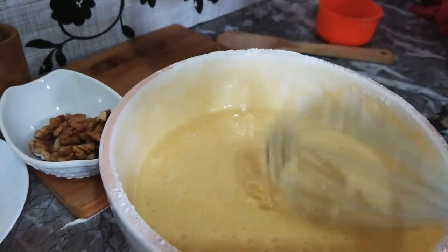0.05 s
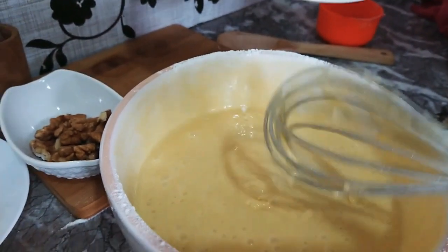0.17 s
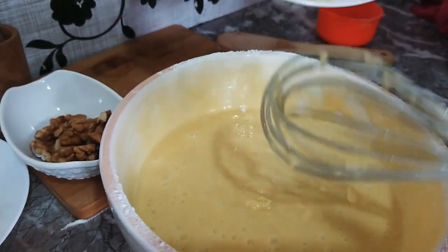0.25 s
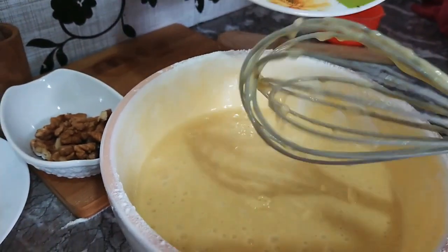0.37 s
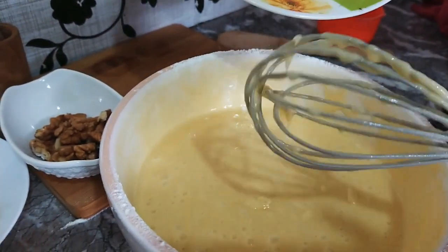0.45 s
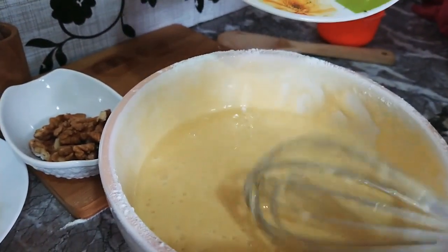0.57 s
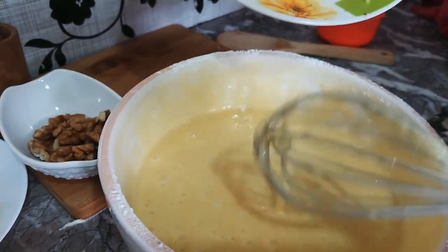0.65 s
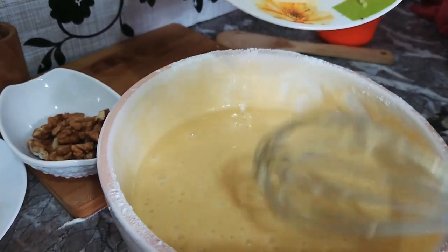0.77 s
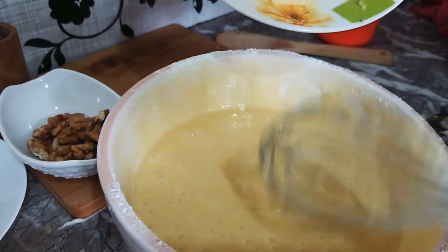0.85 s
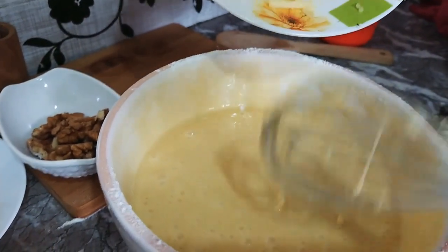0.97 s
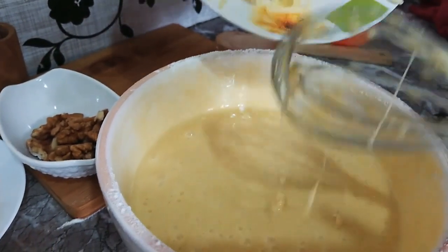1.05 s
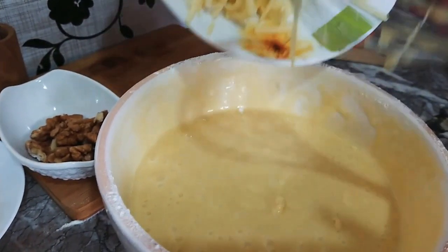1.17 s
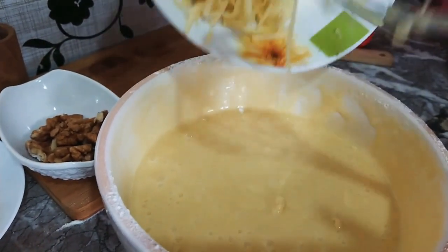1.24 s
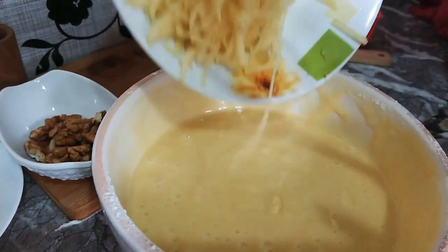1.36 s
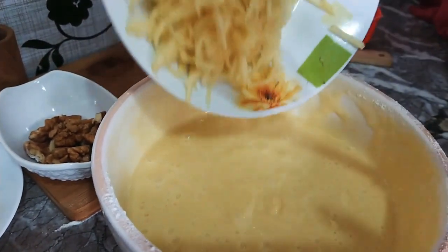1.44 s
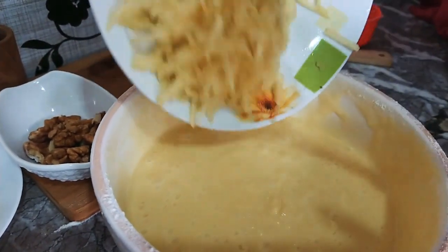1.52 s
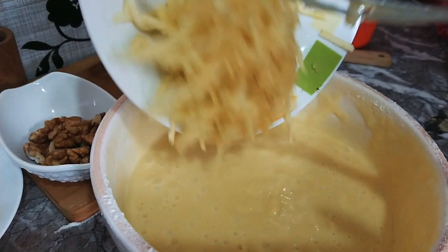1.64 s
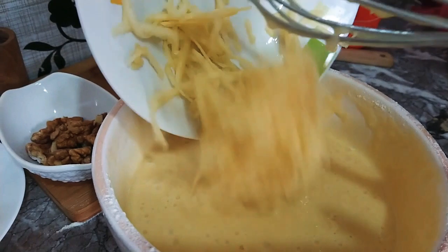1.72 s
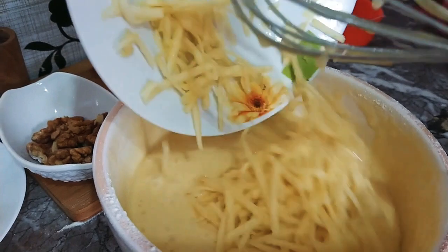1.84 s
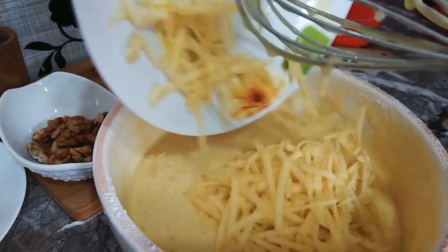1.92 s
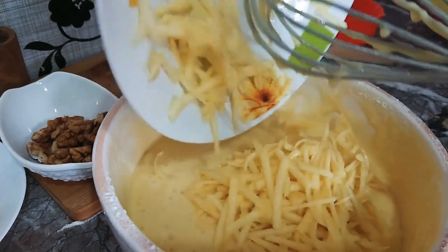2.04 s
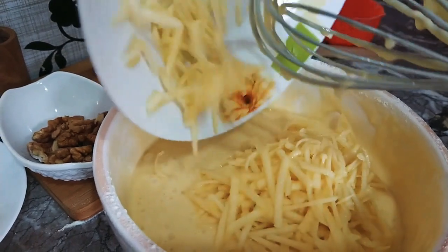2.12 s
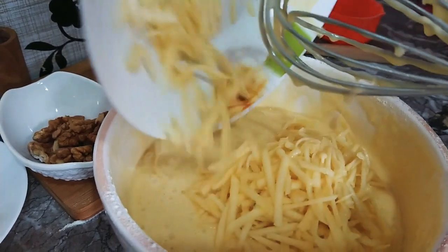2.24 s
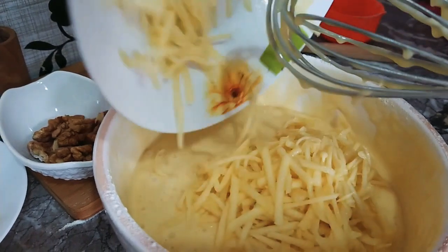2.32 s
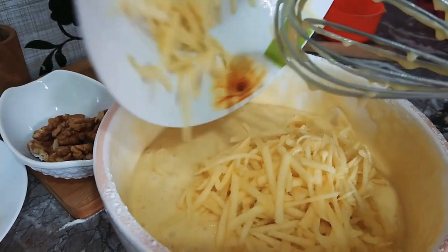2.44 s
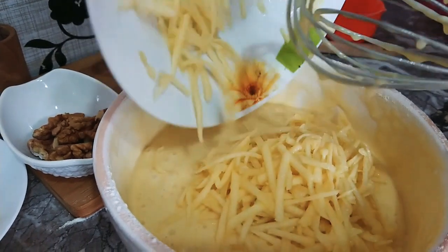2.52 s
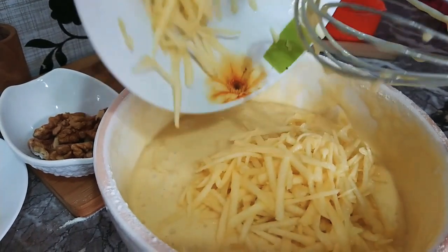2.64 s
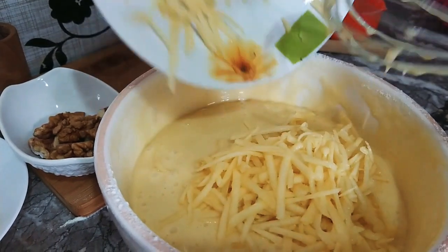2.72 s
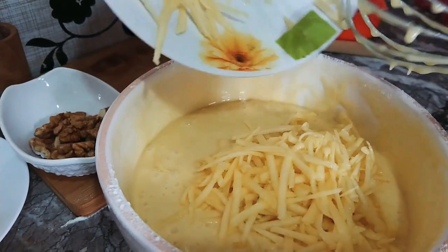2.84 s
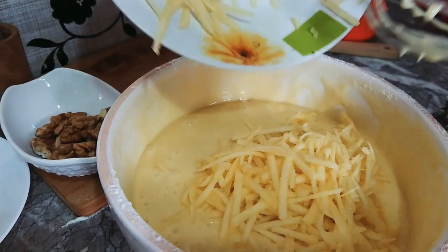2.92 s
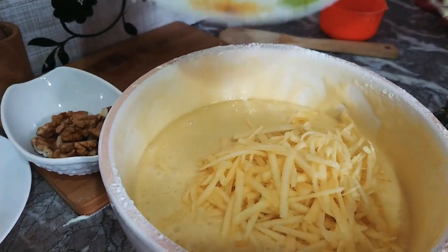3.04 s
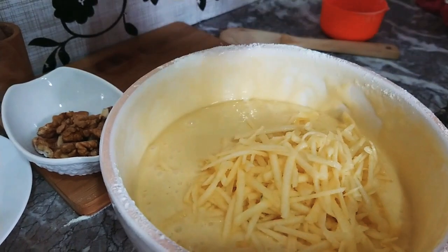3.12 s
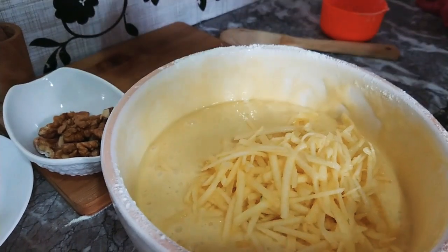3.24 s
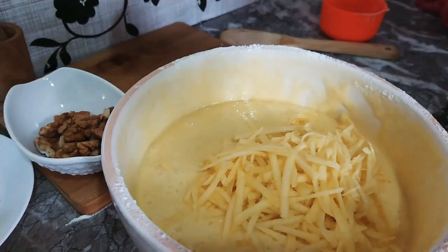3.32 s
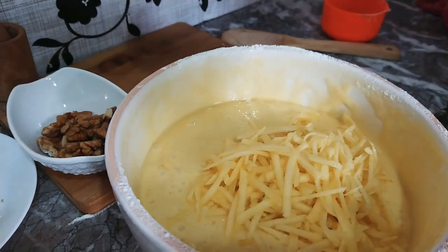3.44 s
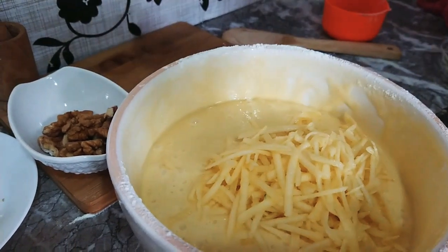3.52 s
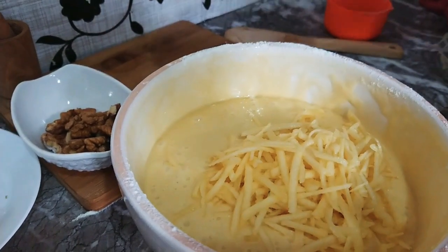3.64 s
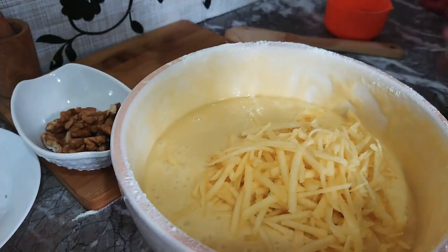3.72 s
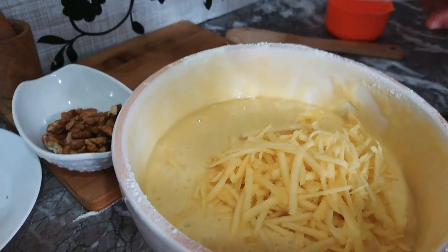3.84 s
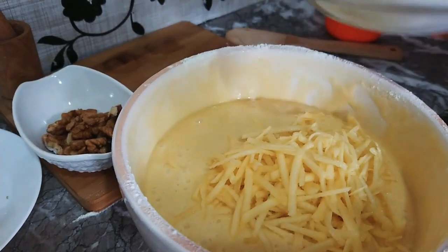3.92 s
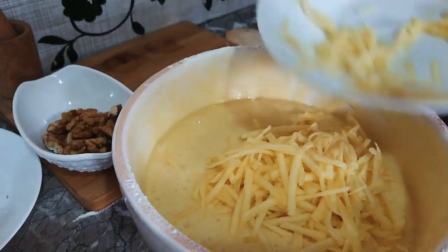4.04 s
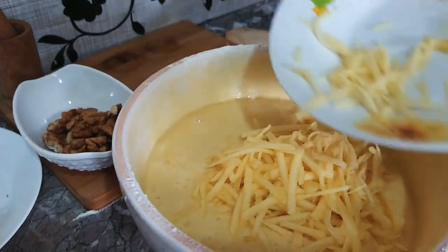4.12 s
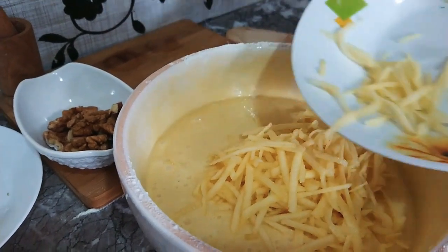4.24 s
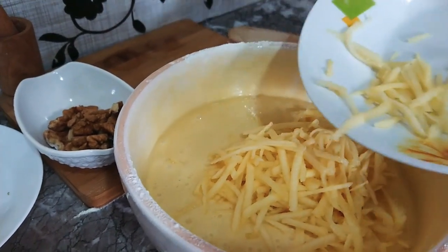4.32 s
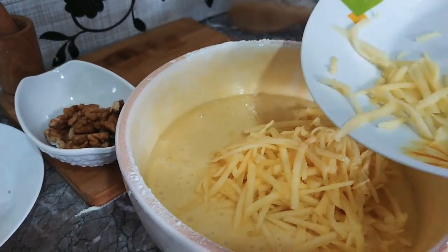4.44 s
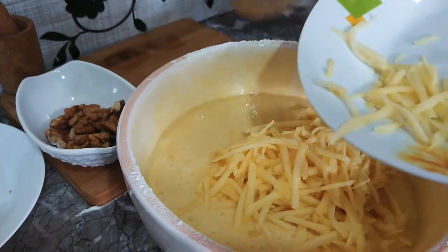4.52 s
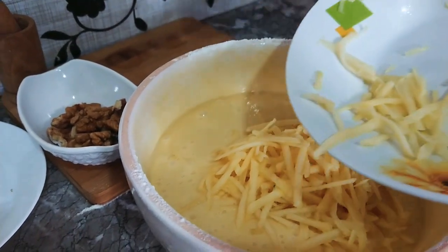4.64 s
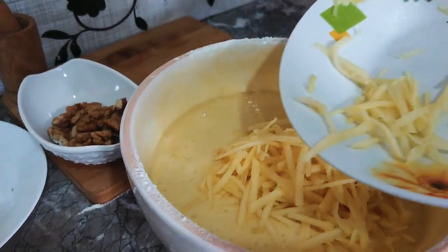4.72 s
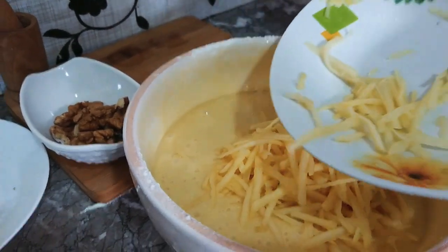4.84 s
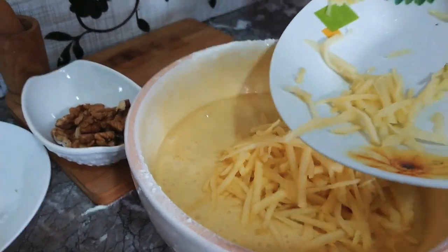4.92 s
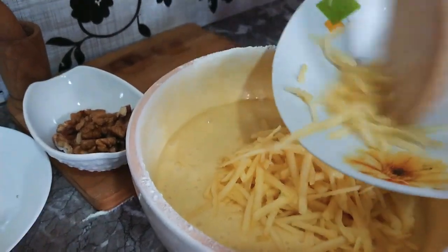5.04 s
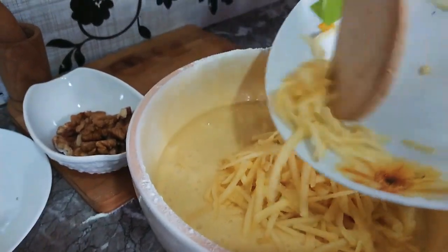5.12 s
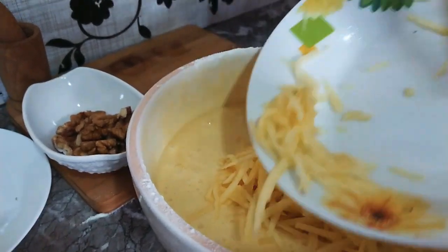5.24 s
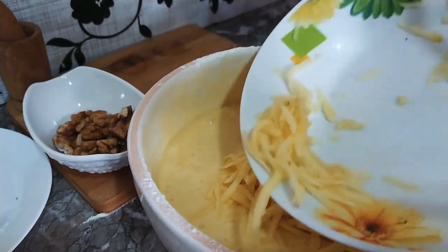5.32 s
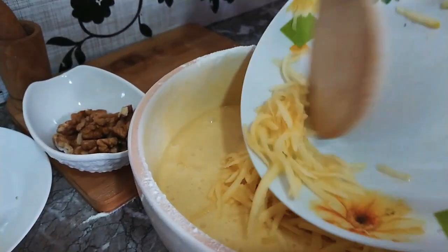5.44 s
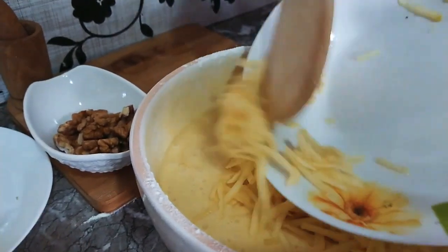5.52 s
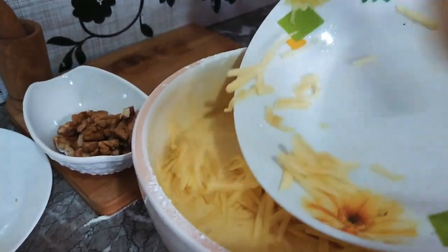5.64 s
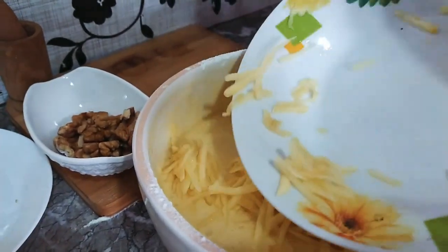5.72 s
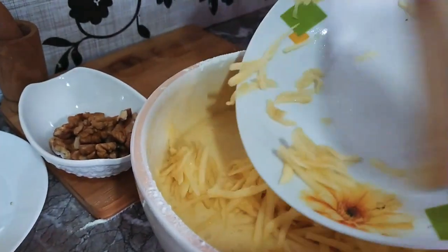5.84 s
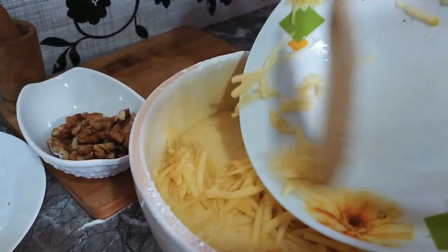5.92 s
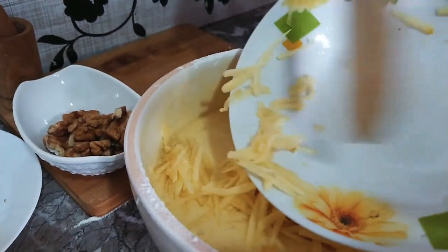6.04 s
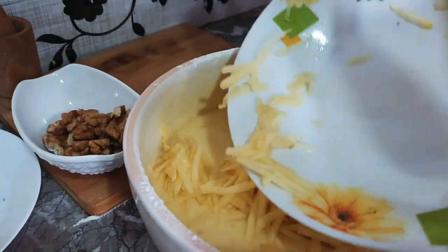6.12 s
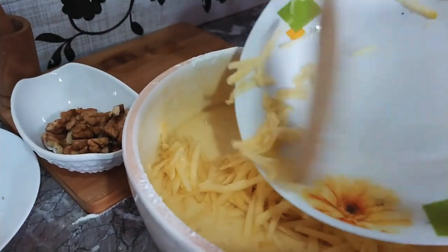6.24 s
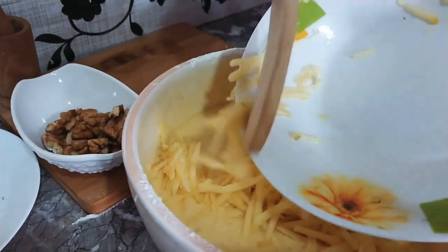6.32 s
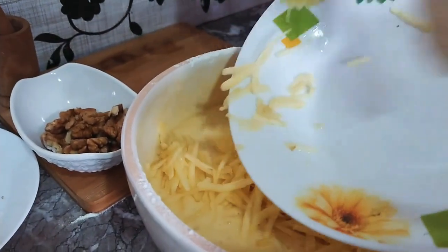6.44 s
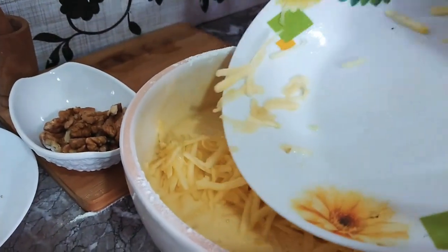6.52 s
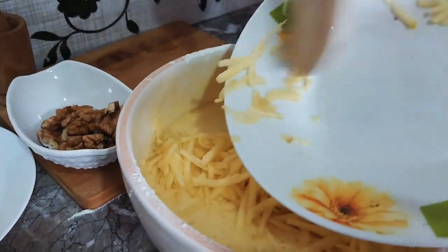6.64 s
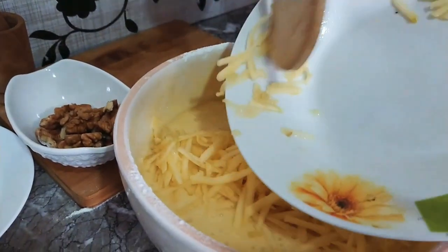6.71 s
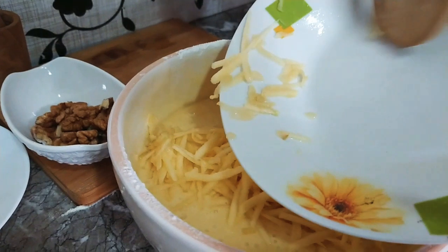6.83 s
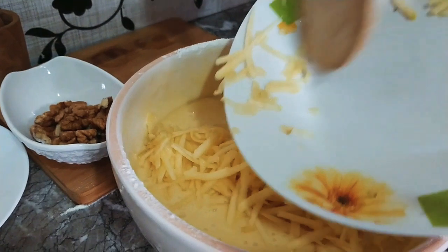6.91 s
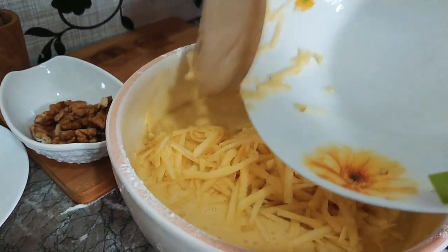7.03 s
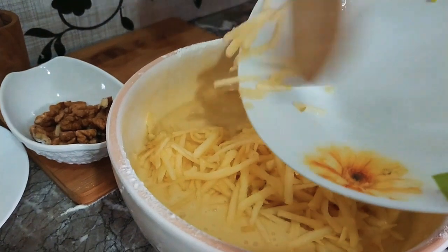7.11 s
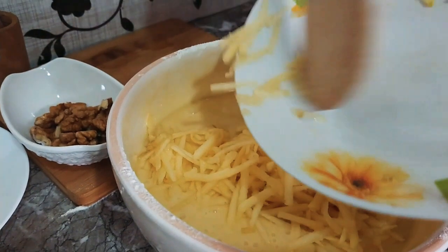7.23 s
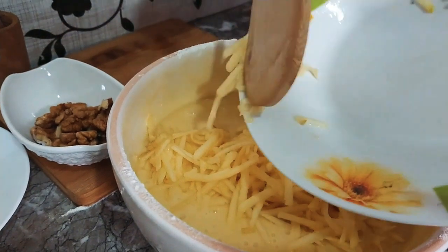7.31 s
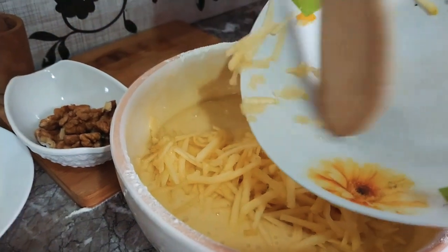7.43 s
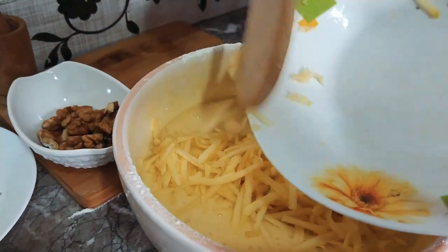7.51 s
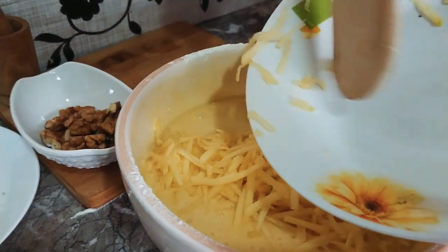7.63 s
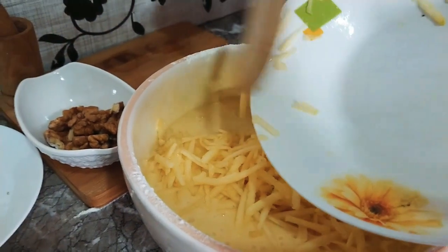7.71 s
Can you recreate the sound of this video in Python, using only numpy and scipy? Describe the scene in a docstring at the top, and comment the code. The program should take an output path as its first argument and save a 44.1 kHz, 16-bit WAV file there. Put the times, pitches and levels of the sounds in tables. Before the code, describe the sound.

Close up in a small, slightly echoing kitchen, a whisk gives five quick metallic taps on a heavy ceramic bowl, which thuds softly on a board. A few seconds of steady microphone hiss follow, with barely audible plops of grated food and light plate rubs. Then a wooden spoon knocks a ceramic plate about a dozen times, some blows ringing, others muffled and hollow.

```python
"""A wire whisk knocks five times on a ceramic bowl of batter, which thuds on its wooden board.
Grated food slides in from a plate; then a wooden spoon knocks the plate clear, with dull clacks and
ringing clinks. Each blow mixes a short burst of noise with fading tones, the natural notes of the dish.
A small kitchen echoes every blow, over a steady microphone hiss."""
import sys
import numpy as np
from scipy import signal
from scipy.fft import rfft, irfft, next_fast_len
from scipy.io import wavfile

SR = 44100
rng = np.random.default_rng(int(sys.argv[2]) if len(sys.argv) > 2 else 0)


def wrap_up_sound(samples):
    """Save the sound to the file named by the first command line argument, as 16-bit audio."""
    columns = np.atleast_2d(samples).T
    # keep every value between -1 and 1, then stretch to whole-number steps
    tamed = np.clip(columns, -1, 1)
    steps = np.round(tamed * 32767).astype(np.int16)
    wavfile.write(sys.argv[1], SR, steps)


N = 342657
AGE = np.arange(int(.5 * SR)) / SR   # seconds since a sound began

# How alike the two channels are. Each row: frequency in Hz, likeness from 0 (unrelated) to 1 (same).
LIKENESS = [(130, .96), (300, .75), (650, .55), (1400, .1), (3000, 0)]
# Where the sound sits between the channels. Each row: frequency in Hz, left minus right in dB.
PAN = [(130, -3), (700, -3.5), (1400, -3.5), (2500, -14), (4400, -14), (8000, -7)]


def whisk(tick_db=1, rim_db=-3, thud_db=-6, bowl_db=-2):
    """The wires tick on the rim; a moment later the heavy bowl rocks and sets the board booming."""
    # Whisk blows. Each row: start in seconds, strength in dB, how freely the rim rings in dB.
    blows = [(0.0433, -22, 1), (0.2042, -21, -2), (0.7112, -28, -9), (0.8707, -24.5, -12),
             (1.0214, -22, -16)]
    # Notes of the wires and rim. Each row: pitch in Hz, level in dB, seconds to fade by 60 dB.
    rim_notes = [(2540, -18.5, 0.31), (2700, -28, 0.32), (3300, -27, .2), (3924, -12, 0.17),
                 (4005, -12, 0.19), (4200, -21, 0.29), (5360, -23, 0.26), (7060, -33, .14),
                 (7300, -34, .14)]
    # Notes of the full bowl on its board, with the same columns.
    bowl_notes = [(114, -9, 0.17), (127.2, -4, 0.3), (157, -8, 0.38), (202.3, -6, 0.19), (332.4, -10, 0.32),
                  (395, -21, .2), (585.6, -5.5, 0.14), (677, -7, 0.21), (707, -5, 0.12), (835, -8, 0.37),
                  (1232, -22, 0.38)]
    # Tone colour of the wires' tick. Each row: frequency in Hz, level in dB.
    tick_colour = [(500, -8), (1400, -1.5), (2000, -8.5), (2700, 2), (3400, 0.5), (4000, 9.5), (4700, -2),
                   (6200, -2), (7300, 6.5), (9000, -7), (16000, -20)]
    # Tone colour of the bowl's thud, with the same columns.
    thud_colour = [(40, -34), (85, -12), (130, 7), (200, -7.5), (255, -11.5), (340, -2), (460, -5),
                   (650, 1.5), (900, -7), (1100, -12), (1450, -17), (2000, -30), (4000, -31)]
    # The bowl rocks after a tick. Each row: delay in seconds, level in dB.
    rocking = [(.006, 3.5), (.019, 0.5), (.028, 0)]
    knocks, rings, hz = np.zeros((2, N)), np.zeros((2, N)), frequencies(AGE.size)
    for start, blow_db, free_db in blows:
        wire_db = blow_db + 0.15 * free_db   # batter that muffles the rim dulls the tick too
        tick = noise(amp(at_hz(tick_colour, hz)), AGE.size, pan=[(1000, -8), (4000, -4)])
        add(knocks, start, amp(wire_db + tick_db) * tick * fade_out(0.03) * fade_in(0.00082))
        add(rings, start, amp(blow_db + free_db + rim_db) * ring(rim_notes, scatter_db=2.5))
        for delay, rock_db in rocking:
            thud = noise(amp(at_hz(thud_colour, hz)), AGE.size) * fade_out(0.1) * fade_in(0.00038)
            add(knocks, start + delay, amp(blow_db + thud_db + rock_db) * thud)
        boom = ring(bowl_notes, scatter_db=2) * fade_in(0.0058)
        add(rings, start + 0.00599, amp(blow_db + bowl_db) * boom)
    return knocks, rings


def spoon(crack_db=-3, bell_db=-7, muffled_db=-6, clink_db=-12, hand_db=-29):
    """Each blow clacks; a free plate rings like a bell, and a hard, short contact adds a bright clink."""
    # Spoon blows. Each row: start in seconds, strength in dB, hardness as the frequency in Hz
    # up to which it sounds bright, how freely the plate rings in dB.
    blows = [ (4.9361, -10, 5960, 0), (5.8346, -14.5, 8100, -7), (5.8808, -15, 1410, -19),
             (6.2404, -6, 2900, -7.5), (6.6316, -9, 7730, -19.5), (6.7401, -17.5, 3400, -23),
             (6.9386, -9.5, 3240, -47), (7.0015, -5.5, 2070, -15.5), (7.229, -31.5, 1500, -22),
             (7.4806, -12, 2380, -17.5), (7.576, -19.5, 5550, -11), (7.6856, -8.5, 3460, -31)]
    # The plate's many fast-fading notes blur into a crack. Each row: frequency in Hz, level in dB.
    crack_colour = [(150, -13.5), (500, -17), (850, -26), (1600, 3), (2050, -25), (2500, 2), (3200, 9.5),
                    (4200, 5), (5200, 2.5), (6200, -1), (7300, 2), (9500, -4), (16000, 2)]
    # The plate swinging freely. Each row: pitch in Hz, level in dB, seconds to fade by 60 dB.
    bell_notes = [(805, -15, 0.24), (840, -12, 0.32), (1640, -10, 0.11), (1712, -5.5, 0.35),
                  (1744, -6.5, 0.27), (2450, -8, 0.16), (2670, -4.5, 0.28), (3728, -12.5, 0.42),
                  (4920, -21, 0.21), (4940, -17.5, 0.22), (6520, -11, 0.2), (7570, -8, 0.19)]
    # The plate's face, rung by a hard contact, with the same columns.
    clink_notes = [(2020, -16, .28), (2330, -8, .28), (2406, -9, .3), (2740, -10, .25), (2966, -10, .24),
                   (3110, -12, .27), (3390, -8, .3), (3483, -12, .3), (3570, -8, .25), (3698, -12, .2),
                   (4000, -14, .28), (4208, -7, .27), (4334, -12, .25), (4683, -18, .25), (5700, -21, .28),
                   (7273, -16, .25)]
    # The held plate, humming briefly after any clack, with the same columns.
    held_notes = [(341.4, -52, 0.37), (825, -27.5, 0.21), (965, -31, 0.13), (1047, -37, 0.078),
                  (1110, -25, 0.097), (1520, -58, .18)]
    knocks, rings, hz = np.zeros((2, N)), np.zeros((2, N)), frequencies(AGE.size)
    direct_pan = [(1000, -7.5), (4000, -7)]   # columns as in PAN
    crack_gain, muffled_gain = amp(at_hz(crack_colour, hz)), muffled_plate(hz)
    treble_floor = amp(-13)
    for start, blow_db, top_hz, free_db in blows:
        clack_hz, width, hard_db = contact(start, blow_db, top_hz)
        ring_db = blow_db + free_db
        # a softer, longer contact reaches fewer of the high notes
        reach = lambda f: (1 - treble_floor) / (1 + (f / top_hz) ** 6) + treble_floor
        add(knocks, start, amp(blow_db) * clack(clack_hz, width, pan_db=-2.5))
        # the whole plate gives a little in the hand
        add(knocks, start, amp(blow_db + hand_db) * clack(hz=350, width=0.22, pan_db=-9))
        crack = noise(crack_gain * reach(hz), AGE.size, direct_pan) * fade_out(0.071)
        add(knocks, start, amp(hard_db + crack_db) * crack)
        muffled = noise(muffled_gain * reach(hz), AGE.size, direct_pan) * fade_out(0.11)
        add(knocks, start, amp(ring_db + muffled_db) * muffled)
        add(rings, start, amp(blow_db) * ring(held_notes, scatter_db=0.5))
        add(rings, start, amp(ring_db + bell_db) * ring(bell_notes, scatter_db=1.5, weight=reach))
        add(rings, start, amp(hard_db + clink_db) * ring(clink_notes, scatter_db=3, weight=reach))
    return knocks, rings


def contact(start, blow_db, top_hz, usual_db=-11, usual_top_hz=3920):
    """A blow's clack pitch, clack width and clink level; stronger, harder ones are shorter, so higher."""
    # Food damps the clack, which turns hollower, and lower once the spoon works at the rim.
    # Each row: time in seconds, pitch of a usual blow in Hz, band width relative to the pitch.
    clack_colour = [(5.9, 1170, 0.93), (6.9, 1370, 0.56), (7.45, 1110, 0.36)]
    times, pitches, widths = np.transpose(clack_colour)
    hardness = np.log2(top_hz / usual_top_hz)
    rise_octaves = .02 * (blow_db - usual_db) + 0.1 * hardness
    clack_hz = np.interp(start, times, pitches) * 2 ** rise_octaves
    hard_db = blow_db - 14.5 + 13 * hardness
    return clack_hz, np.interp(start, times, widths), hard_db


def clack(hz, width, pan_db):
    """Wood on ceramic: one swing that dies at once, made by filtering a click to a band around hz."""
    edges = np.clip([hz / (1 + width), hz * (1 + width)], 20, .45 * SR)
    click = (AGE == 0) + 1e-18
    swing = -signal.sosfilt(signal.butter(2, edges, "band", fs=SR, output="sos"), click)
    return swing / np.abs(swing).max() * sides(pan_db)


def muffled_plate(hz):
    """Gain at each frequency while the spoon still touches the plate and blurs its notes."""
    # The plate's blurred notes. Each row: centre in Hz, width in Hz, level in dB.
    peaks = [(850, 75, 2), (1120, 125, -5), (1655, 85, 4), (2570, 235, -1), (3630, 150, -21),
             (4910, 160, -9.5)]
    power = sum(amp(2 * db) / (1 + ((hz - centre) / width) ** 2) ** 2 for centre, width, db in peaks)
    return np.sqrt(power)


def food(small_lump_s=0.018, small_plop_hz=344):
    """Each lump rustles off the plate, then plops into the bowl; the bigger, the lower."""
    # Lumps of grated food. Each row: time in seconds, length in seconds, level in dB.
    lumps = [(1.512, 0.021, -53), (1.801, .1, -58)]
    out = np.zeros((2, N))
    for time, length, db in lumps:
        plop_hz = small_plop_hz * (small_lump_s / length) ** 0.71
        rustle = swell(time, length, hz=1020, octaves=0.53, db=db)
        plop = swell(time + 0.027, length + 0.018, plop_hz, octaves=1, db=db + 1.2)
        out += rustle + plop
    return out


def handling():
    """The plate rubs with a faint note inside a broader scuff; the board takes a few dull bumps."""
    # Plate rubs. Each row: time in seconds, length in seconds, pitch in Hz, level in dB.
    rubs = [(2.849, 0.086, 735, -56), (4.273, 0.027, 1196, -56)]
    # Soft bumps on the board. Each row: time in seconds, level in dB.
    bumps = [(0.0, -42), (4.96, -56), (7.295, -51.5)]
    out = np.zeros((2, N))
    for time, length, hz, db in rubs:
        note = swell(time, length, hz, octaves=0.059, db=db)
        scuff = swell(time, length, hz, octaves=0.59, db=db - 3)
        out += note + scuff
    return out + sum(swell(time, length=0.042, hz=124, octaves=0.68, db=db) for time, db in bumps)


def kitchen(sound, build_s=0.0013, early_db=-16, early_fade_s=0.13):
    """Quick echoes off the worktop and dishes, then a smooth tail whose length depends on pitch."""
    # The room's echo. Each row: frequency in Hz, seconds to fade by 60 dB.
    fade_times = [(120, 0.56), (400, 0.4), (1000, 0.3552), (3000, 0.43), (7000, 0.5), (14000, 0.37)]
    hz = frequencies(AGE.size)
    spectrum = rfft(noise(np.ones_like(hz), AGE.size))
    early = amp(early_db) * fade_out(early_fade_s)
    echo = np.zeros((2, AGE.size))
    for band_hz, fade_s in fade_times:
        share = at_hz([(f, f == band_hz) for f, _ in fade_times], hz)
        echo += irfft(spectrum * share, AGE.size) * (fade_out(fade_s) + early)
    echo *= 1 - np.exp(-(AGE / build_s) ** 2)
    echo /= np.sqrt(np.sum(echo ** 2) / 2)
    return signal.fftconvolve(sound.mean(0, keepdims=True), echo, axes=1)[:, :N]


def hiss(left_db=-45, right_db=-37.5, rumble_db=-61.5):
    """Each microphone has a steady hiss of its own; both hear a faint room rumble."""
    # Tone colours of the two hisses and the rumble. Each row: frequency in Hz, level in dB.
    left_colour = [(300, -11), (600, -9), (1400, -11), (2100, -3), (2900, -5), (3180, 0), (3500, -3),
                   (5800, -2), (6450, 5), (6900, 1), (9300, 0.5), (10500, 2), (15800, 5)]
    right_colour = [(300, 0), (1550, -1), (2850, 8.5), (3220, 13.5), (3500, 9), (4100, 7.5), (5500, 9),
                    (6200, 5), (7100, 11.5), (8200, 7.5), (9800, 6.5), (12500, 10.5), (14000, 10),
                    (15800, 11)]
    rumble_colour = [(20, 5), (45, 1), (80, 1), (130, -0.5), (230, -20.5), (350, -7.5), (700, -9.5),
                     (1500, -14), (4000, -54)]
    size, centred = next_fast_len(N), [(1, 0)]
    steady = lambda colour, pan: noise(amp(at_hz(colour, frequencies(size))), size, pan)[:, :N]
    left = amp(left_db) * steady(left_colour, centred)[0]
    right = amp(right_db) * steady(right_colour, centred)[1]
    return np.array([left, right]) + amp(rumble_db) * steady(rumble_colour, PAN)


def ring(notes, scatter_db, weight=np.ones_like):
    """A struck dish's fading notes; each blow gives them new random strengths."""
    out = 0
    for k, (hz, db, fade_s) in enumerate(notes):
        # high notes reach the two microphones out of step
        phase_gap = np.arccos(np.clip(at_hz(LIKENESS, hz), -1, 1)) * rng.choice([-1, 1])
        tone = np.sin(2 * np.pi * hz * AGE + np.array([[phase_gap], [0]]))
        gain = amp(db + scatter_db * rng.standard_normal()) * weight(float(hz)) * sides(at_hz(PAN, hz))
        out = out + (-1) ** k * gain * fade_out(fade_s) * tone
    return out


def swell(time, length, hz, octaves, db):
    """A brief swell of noise, spread some octaves around one pitch and loudest at the given time."""
    out, start = np.zeros((2, N)), max(time - AGE[-1] / 2, 0)
    loudness = np.exp(-.5 * ((start + AGE - time) / length) ** 2)
    octaves_away = np.log2(np.maximum(frequencies(AGE.size), 1) / hz)
    band = np.exp(-.5 * (octaves_away / octaves) ** 2)
    add(out, start, amp(db) * loudness * noise(band, AGE.size))
    return out


def noise(gain, size, pan=PAN):
    """Stereo noise; the gain at each frequency sets its tone colour, not its overall level."""
    hz = frequencies(size)
    alike = np.clip(at_hz(LIKENESS, hz), -1, 1)
    shared, opposed = rfft(rng.standard_normal((2, size)))
    pair = np.sqrt((1 + alike) / 2) * shared + np.sqrt((1 - alike) / 2) * opposed * [[1], [-1]]
    return irfft(pair * gain * sides(at_hz(pan, hz)), size) / np.sqrt(np.mean(gain ** 2))


def fade_in(seconds):
    """A rise from 0 to 1, about two thirds done after this time."""
    return 1 - np.exp(-AGE / seconds)


def fade_out(seconds):
    """A fall of 60 dB in this time."""
    return np.exp(-np.log(1000) * AGE / seconds)


def amp(db):
    """Turn decibels into a gain."""
    return 10 ** (np.asarray(db) / 20)


def at_hz(points, hz):
    """Read between a table's rows, with octaves evenly spaced."""
    row_hz, value = np.transpose(points)
    return np.interp(np.log(np.maximum(hz, 1)), np.log(row_hz), value)


def sides(pan_db):
    """Left and right gains; positive dB leans left."""
    return amp(np.array([[.5], [-.5]]) * pan_db)


def add(out, start_s, sound):
    """Mix a stereo sound in at a time."""
    first = max(round(start_s * SR), 0)
    out[:, first:first + sound.shape[1]] += sound[:, :N - first]


def frequencies(size):
    """The frequencies in Hz that make up a sound of this many samples."""
    return np.fft.rfftfreq(size, 1 / SR)


def scene(whisk_echo_db=-2, spoon_echo_db=-1, ring_echo_db=-15):
    """Whisk and spoon close to the microphone, with the kitchen around them."""
    whisk_knocks, bowl_rings = whisk()
    spoon_knocks, plate_rings = spoon()
    rings = bowl_rings + plate_rings
    knocks_to_room = amp(whisk_echo_db) * whisk_knocks + amp(spoon_echo_db) * spoon_knocks
    room = kitchen(knocks_to_room + amp(ring_echo_db) * rings)
    return whisk_knocks + spoon_knocks + rings + room + food() + handling() + hiss()


def record(dry, low_cut_hz=62, peak_limit=.88, high_cut_hz=15780):
    """The microphone drops the deep bass, clips the very loudest peaks and cuts the highest treble."""
    thinned = signal.sosfilt(signal.butter(2, low_cut_hz, "high", fs=SR, output="sos"), dry)
    clipped = np.clip(thinned, -peak_limit, peak_limit)
    return signal.sosfilt(signal.ellip(12, .1, 80, high_cut_hz, fs=SR, output="sos"), clipped)


dry = scene()
out = record(dry)
wrap_up_sound(out)
```